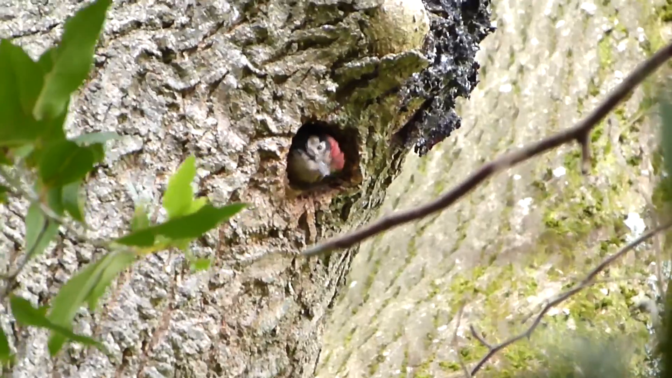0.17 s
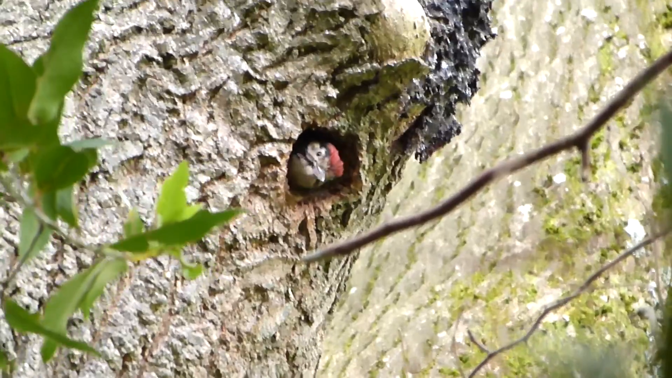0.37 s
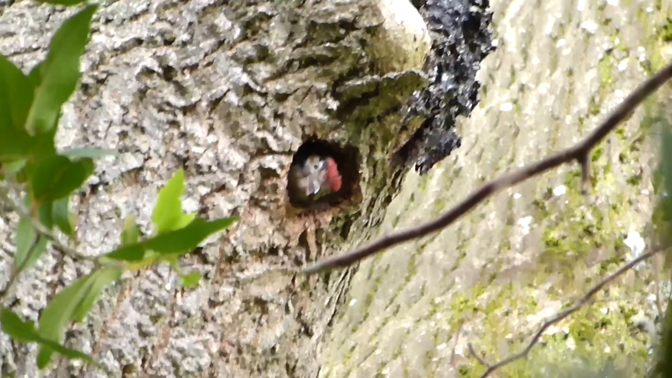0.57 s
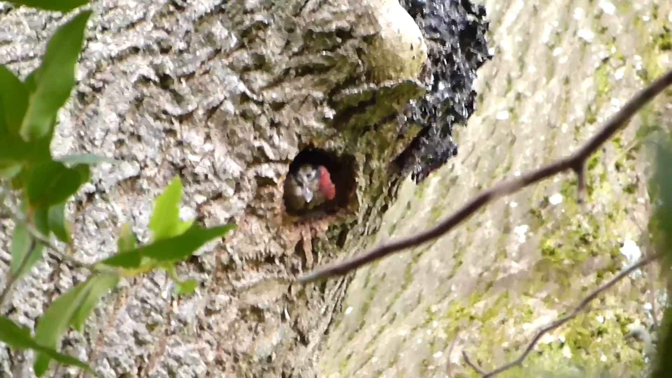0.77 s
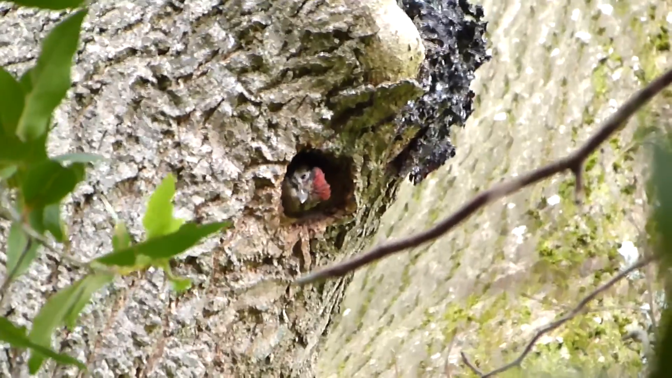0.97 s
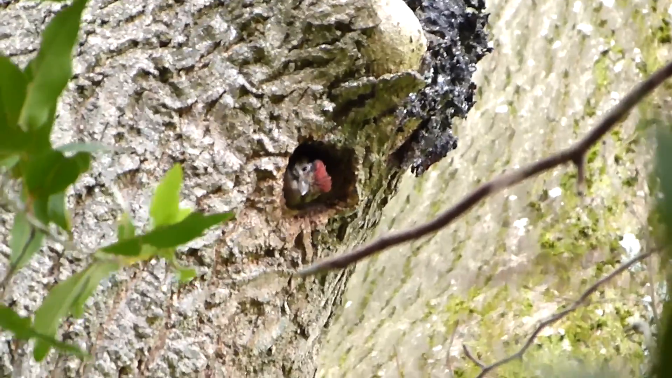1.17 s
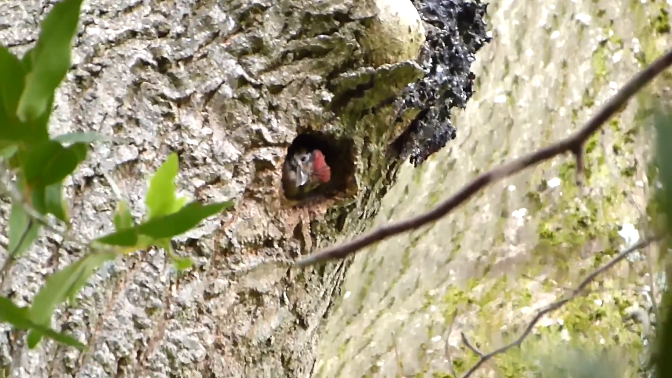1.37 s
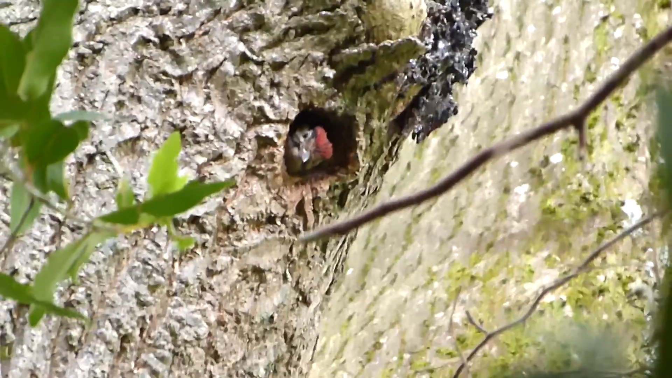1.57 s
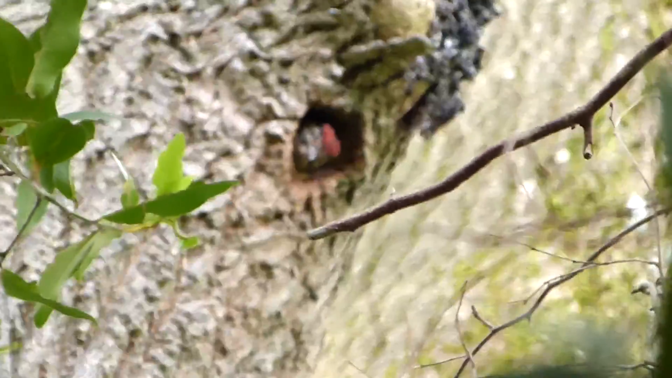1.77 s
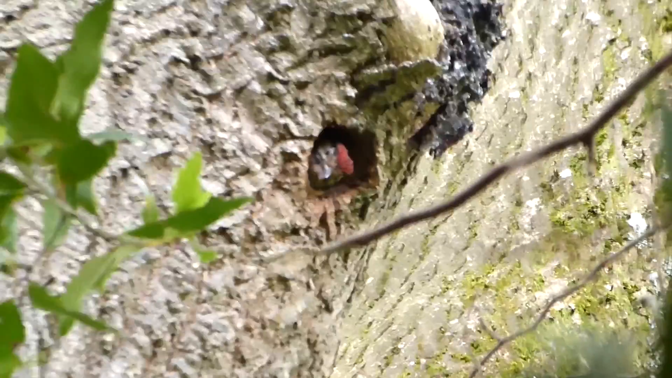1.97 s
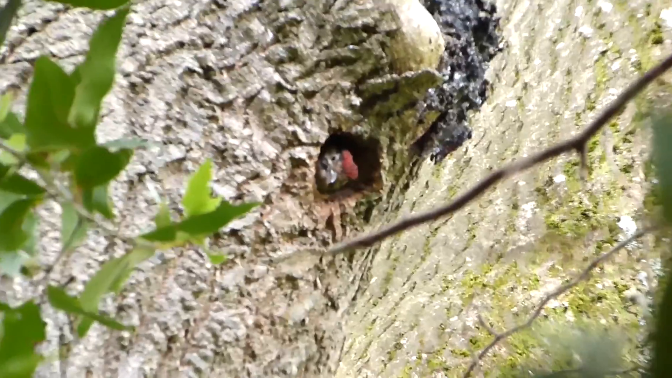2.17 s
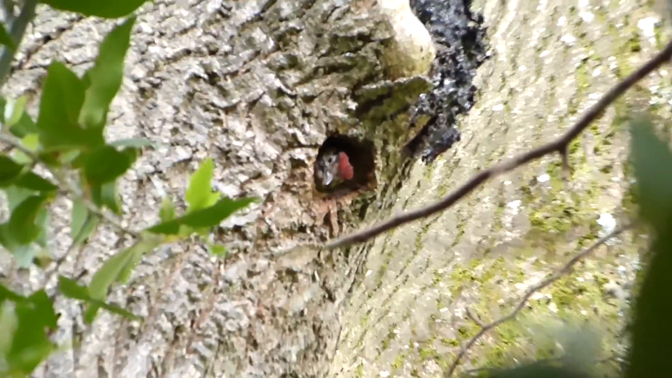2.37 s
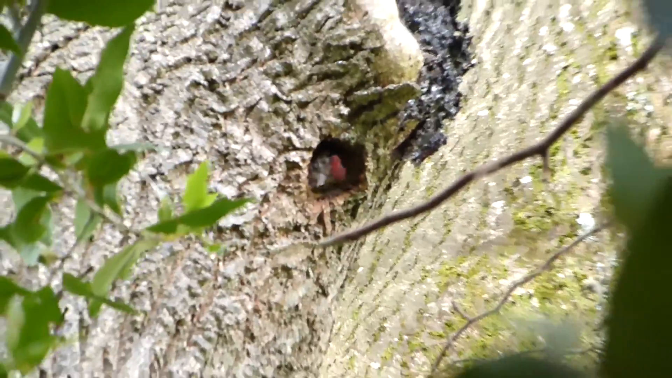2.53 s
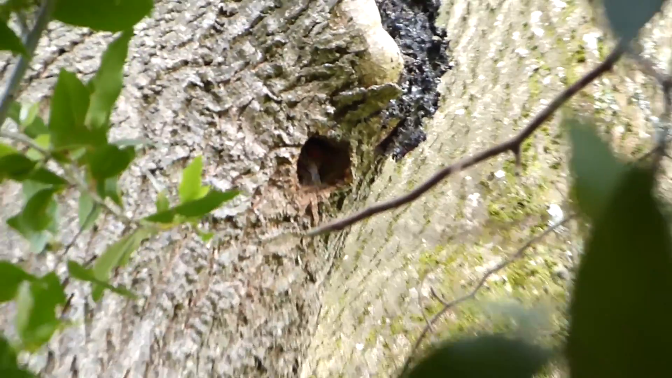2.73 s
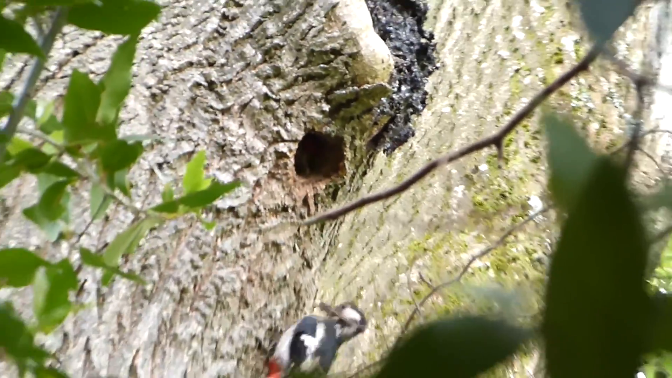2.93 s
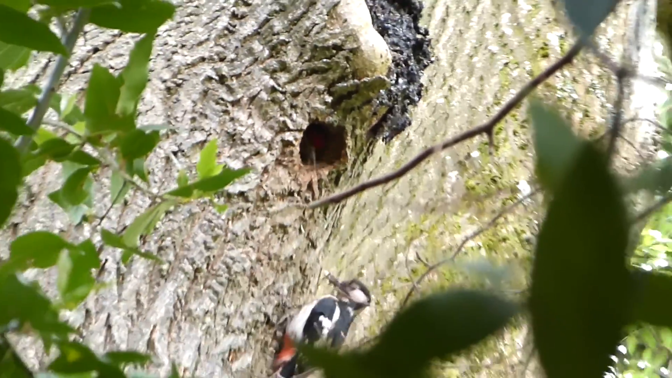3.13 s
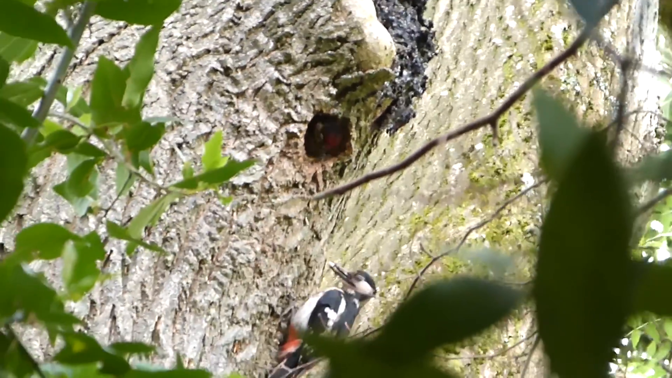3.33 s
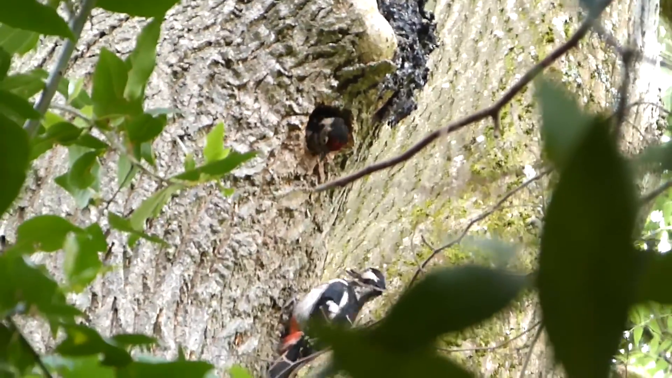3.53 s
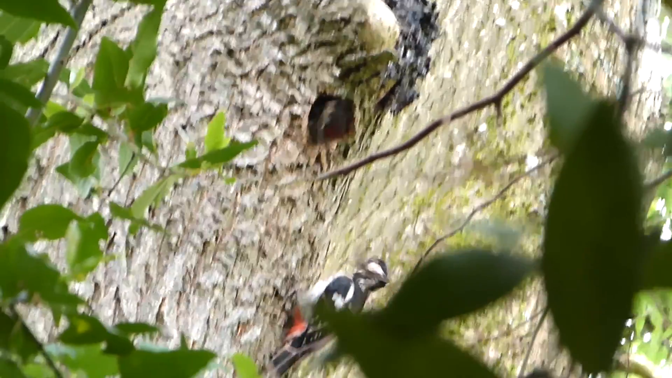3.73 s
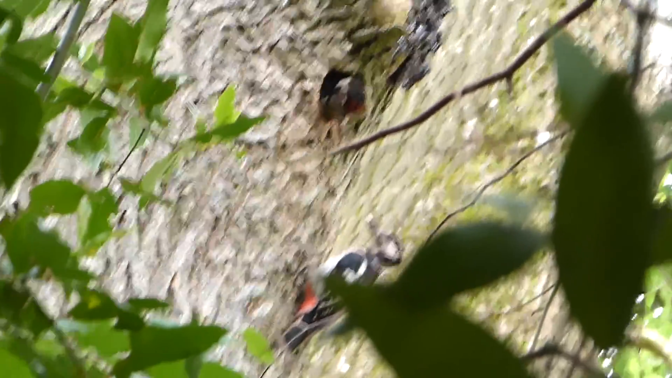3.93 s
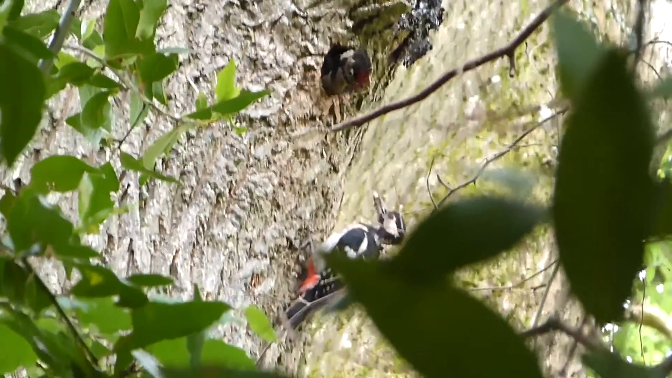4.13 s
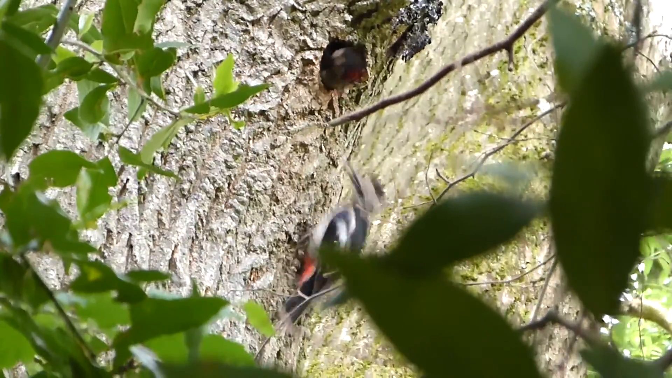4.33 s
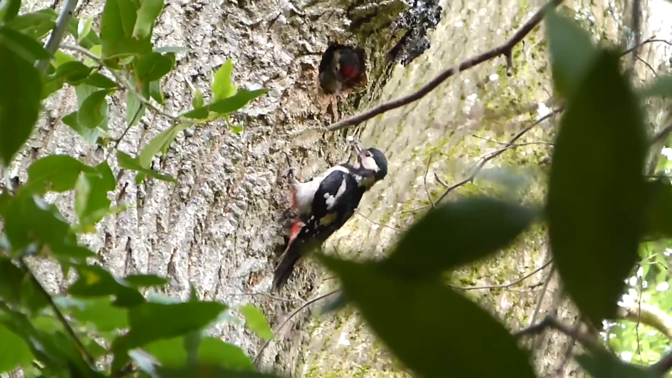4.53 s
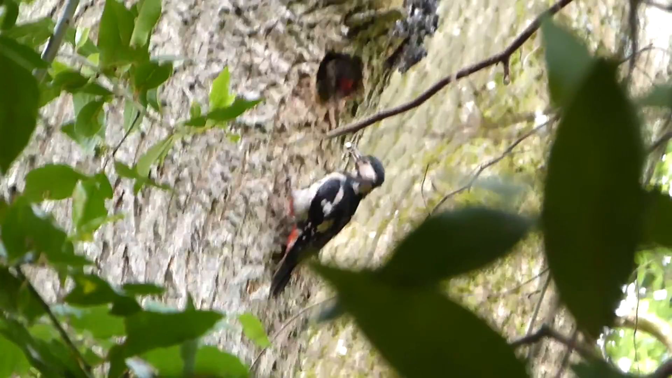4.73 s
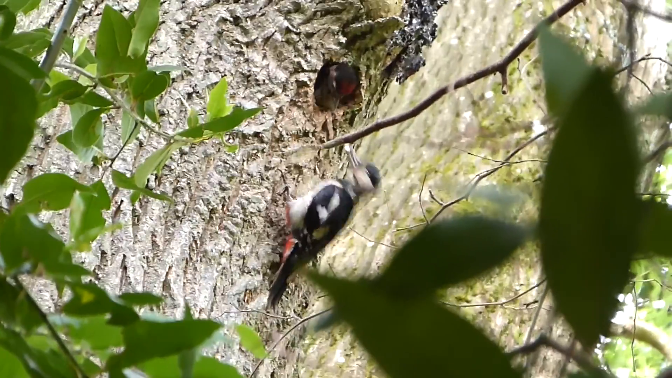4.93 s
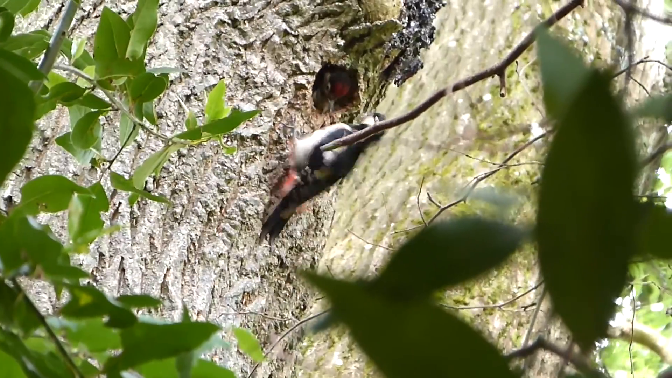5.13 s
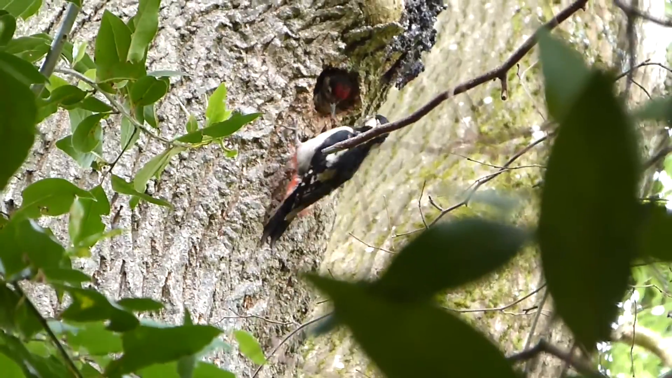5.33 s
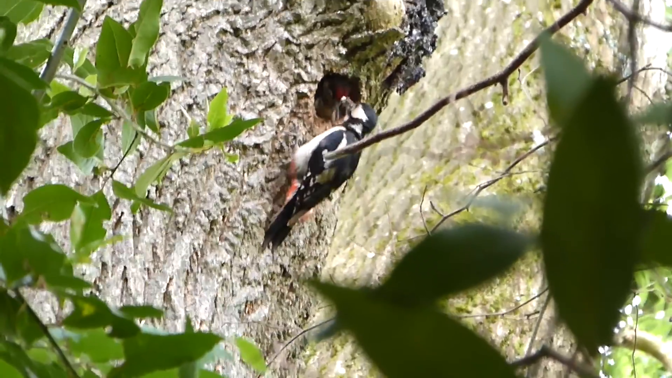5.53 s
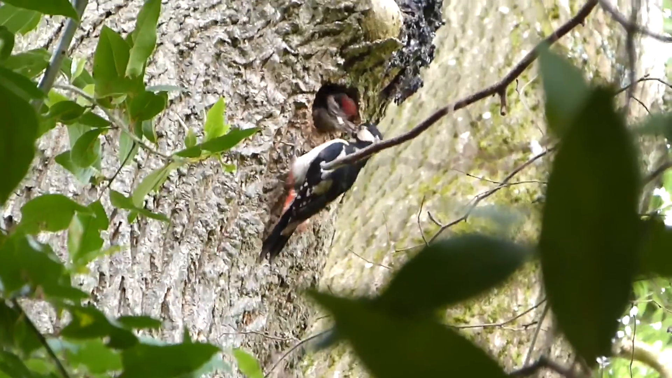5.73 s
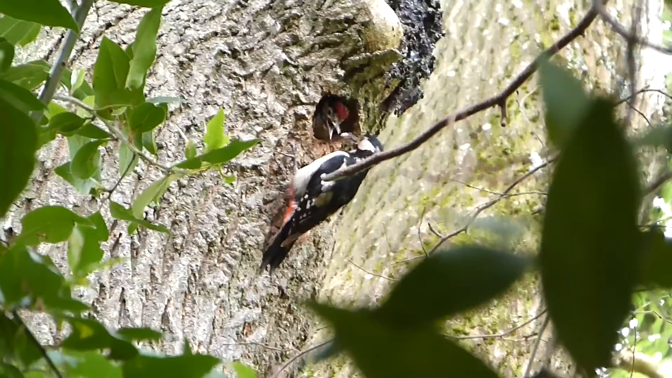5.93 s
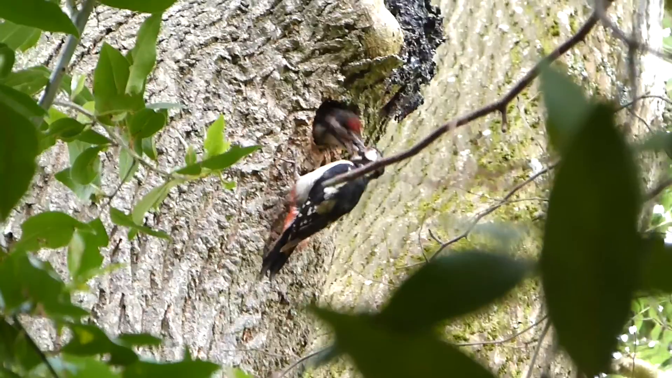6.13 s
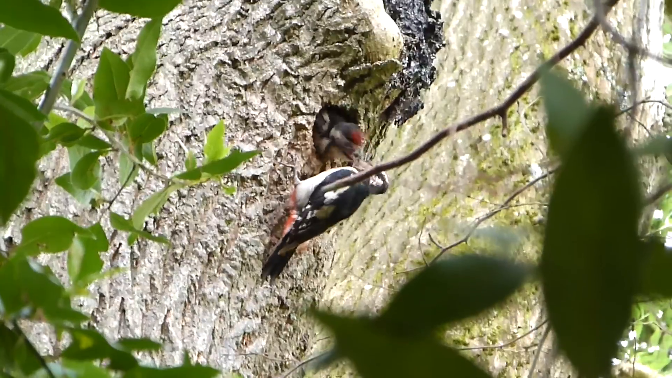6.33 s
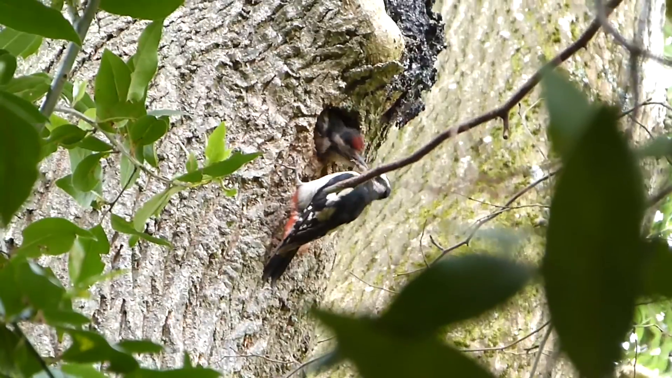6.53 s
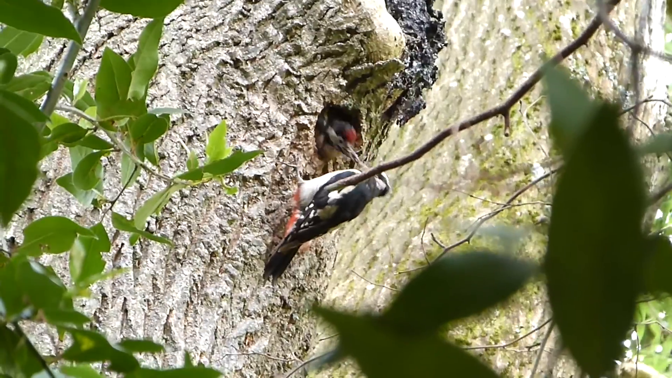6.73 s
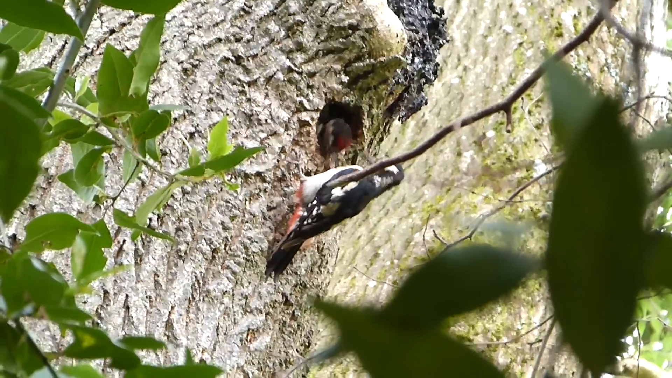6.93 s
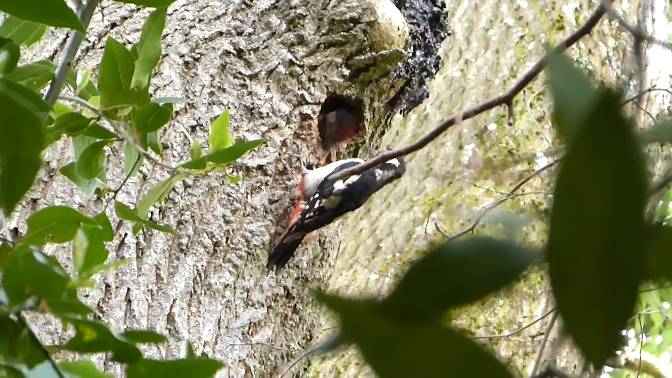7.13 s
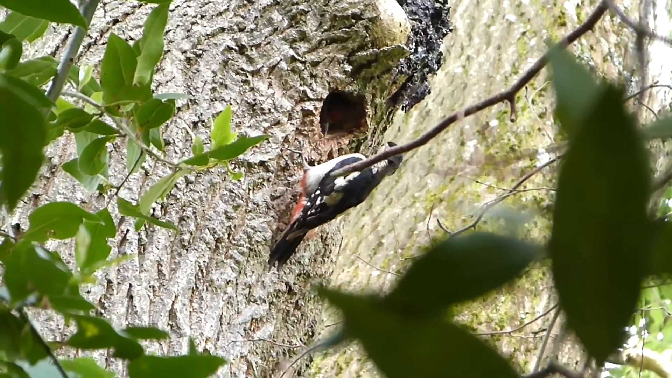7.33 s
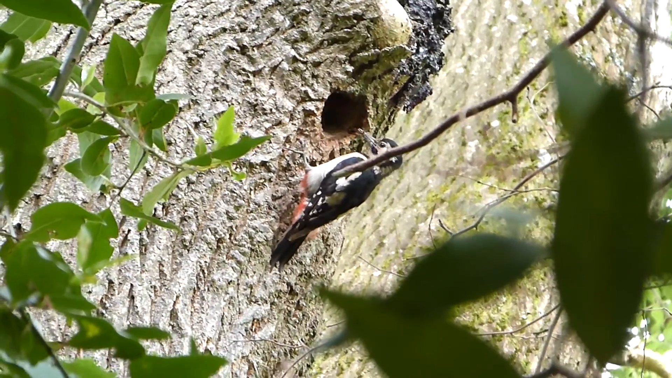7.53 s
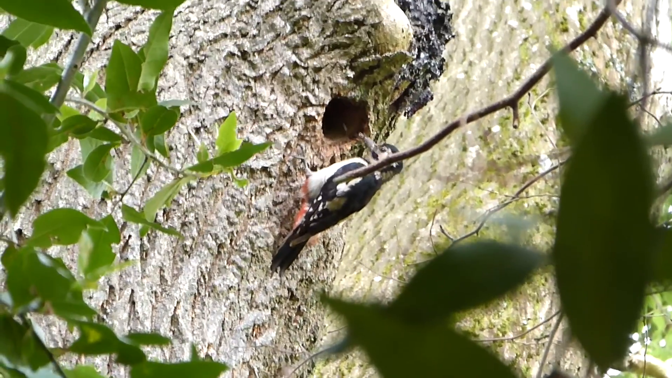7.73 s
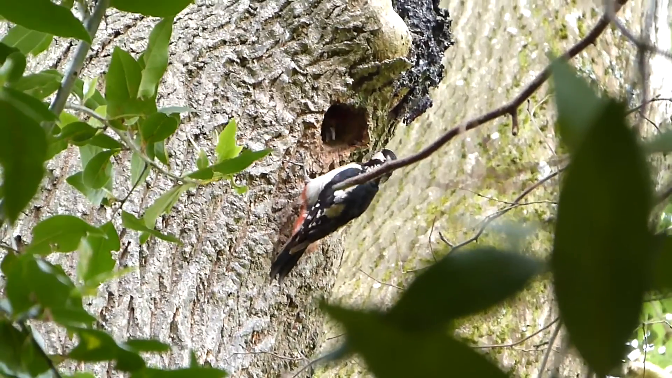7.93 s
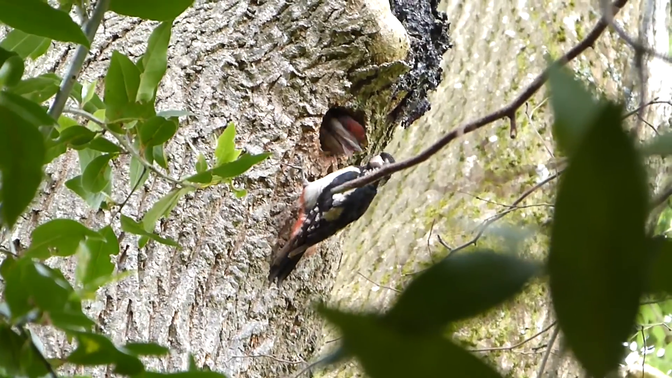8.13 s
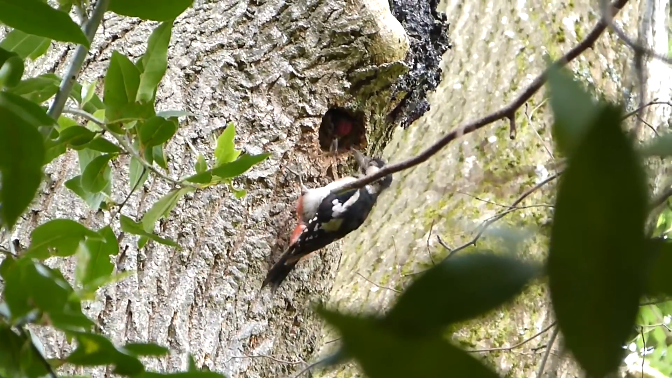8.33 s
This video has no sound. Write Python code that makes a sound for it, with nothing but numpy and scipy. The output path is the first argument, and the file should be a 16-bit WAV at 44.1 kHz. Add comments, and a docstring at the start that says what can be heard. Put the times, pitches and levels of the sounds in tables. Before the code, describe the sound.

A woodpecker chick begs in quick, high arched squeaks, swelling loud and harsh then turning raspy, while a wood pigeon coos low nearby.

```python
"""A wooded garden, close to a nest hole in a tree trunk: a woodpecker chick begs with short arched squeaks
that grow loud, some with harsh squawks, as the parent comes to feed it, then turn quieter and raspier.
Each squeak is a stack of harmonics around a beak resonance; short noise bursts add knocks, ticks and rasps.
A wood pigeon coos nearby, a wavering sine mixed with throat noise; gliding sines make the fainter birds beyond.
The trees return short echoes and noise tails; behind it all lie a steady coloured-noise hush and a deep rumble."""
import sys
import numpy as np
from scipy import signal
from scipy.fft import rfft, irfft
from scipy.io import wavfile

SR = 44100
rng = np.random.default_rng(int(sys.argv[2]) if len(sys.argv) > 2 else 0)


def to_wav(sig):
    """Store sig (one row per channel, or 1-D mono) as 16-bit WAV at the path in sys.argv[1].

    Samples outside -1..1 are clipped; the rate is SR.
    """
    pcm = np.clip(np.atleast_2d(sig), -1, 1) * 32767
    pcm = np.round(pcm).astype(np.int16)
    wavfile.write(sys.argv[1], SR, pcm.T)  # frames by channels


N = 369999
TIME = np.arange(N) / SR   # seconds

# levels of the background, joined by straight lines: time_s, low_hush_db, leaf_hiss_db (both before trim)
HUSH_LEVELS = [(0, -46, -45.5), (1.5, -46.5, -48), (2.4, -50, -47.5), (3.5, -49, -46), (4.2, -46.5, -44),
               (8.39, -45.5, -44)]
LOW_TRIM_DB, LEAF_TRIM_DB = 2.0, 1.0
# colour of the low distant hush: frequency_hz, relative_level_db
LOW_HUSH_COLOUR = [(20, -50), (90, -36), (125, -13.5), (160, -4), (210, -1), (260, 1.5), (400, -2),
                   (600, -4), (900, -7), (1200, -36), (2000, -100)]
# colour of the leaf hiss: frequency_hz, relative_level_db
LEAF_COLOUR = [(350, -12), (600, -9.5), (669, -8.5), (736, -6.5), (1250, -5.5), (1560, -8.5), (3290, -11),
               (6580, -16), (8180, -18.5), (12600, -28.5), (14700, -54), (15500, -60)]
# colour of the deep, distant rumble: frequency_hz, relative_level_db
RUMBLE_COLOUR = [(10, -45), (25, -34), (45, -19), (61, 10), (80, 0), (110, -1), (200, -22), (500, -100)]
RUMBLE_DB = -62   # between its swells
# swells of the rumble: middle_s, half_width_s, rise_db
RUMBLE_SWELLS = [(3.32, 0.055, 14), (6.65, 0.26, 9)]
# how alike the background is at the two microphones: frequency_hz, correlation (0-1)
MICROPHONE_LIKENESS = [(30, 0.36), (80, 0.98), (200, 0.98), (500, 0.96), (1000, 0.82), (2000, 0.35),
                       (4000, 0.44), (8000, 0.12), (14000, 0.055)]

# knocks, ticks, and the chick's scratchy rasps before and during its squeaks:
# start_s, level_db, rise_and_decay_s, centre_hz
SHORT_BURSTS = [(1.31, -48, 0.0017, 401), (1.7408, -32.5, 0.001, 1080), (1.543, -46, 0.0012, 1500),
                (2.953, -49, .005, 9600), (3.215, -48, .007, 5000), (4.435, -47.5, .007, 7000),
                (5.863, -39.5, 0.0069, 6300), (6.078, -33, 0.013, 6470), (6.135, -35.5, 0.0076, 10500),
                (6.319, -39, 0.0097, 9100), (7.64, -53, 0.0072, 2500)]

# thin high notes of small birds further off: start_s, length_s, start_hz, end_hz, level_db
THIN_NOTES = [(1.03, 0.15, 8130, 8300, -56), (1.797, 0.074, 8250, 8100, -52), (1.95, 0.6, 6850, 7000, -56),
              (2.3, 0.19, 8150, 8200, -59), (2.5, .2, 6950, 6800, -59), (5.374, 0.23, 8450, 8550, -47),
              (6.77, .14, 8720, 8450, -52), (6.84, 0.013, 5900, 5650, -37), (6.972, 0.24, 8340, 7900, -55)]
# faint, far gliding calls: start_s, length_s, start_hz, end_hz, level_db
FAR_CALLS = [(1.85, 0.72, 2680, 2530, -58), (3.55, .45, 1092, 968, -46.5), (3.8, 0.38, 990, 840, -50.5),
             (3.72, 0.27, 2170, 1805, -51), (3.9, 0.34, 1400, 1286, -47.5), (7.44, 0.34, 973, 960, -52),
             (7.48, 0.35, 1460, 1420, -55)]

# pigeon's coos, a five-note phrase about every three seconds:
# start_s, length_s, top_pitch_hz, time_to_scoop_s, sag (0-1), level_db (before trim), husky_tail_s
COOS = [(-0.16, 0.27, 532, 0.033, 0.1, -31.5, 0.012), (0.322, 0.51, 531.4, .028, 0.37, -32, 0.035),
        (0.983, 0.2, 524.5, 0.016, .45, -29.5, 0.085), (1.708, .24, 451.6, 0.018, 0.1, -34.5, 0.082),
        (2.129, 0.05, 455.5, 0.0046, .05, -30.5, 0.252), (2.775, 0.26, 498.7, 0.049, 0, -30.5, 0.02),
        (3.28, .53, 511, .028, 0.2, -32, 0.05), (3.962, .18, 513, 0.0183, 0.59, -28.5, 0.075),
        (4.696, 0.28, 430.4, .008, 0, -28.5, 0.069), (5.14, 0.033, 421, 0.0057, .1, -34, .2),
        (5.742, .275, 497.4, 0.073, 0.46, -29, 0.016)]
COO_TRIM_DB = 1.96
# the swollen throat favours the middle of the range: pitch_hz, gain_db
CROP_GAIN = [(340, -11), (378, -8), (415, -3), (450, 2), (490, -2), (515, -4), (538, -5.5)]
SLACK_HZ = 371.2   # pitch of the slack throat, which every coo rises from and falls back towards
COO_SCOOP_S, COO_DROP_S = 0.012, 0.013   # how fast the pitch scoops up and drops
COO_SAG_POWER = 3.3   # higher sags later
COO_ATTACK_S, COO_RELEASE_S, TAIL_FADE_DB_PER_S = 0.0093, 0.032, 20
COO_SWELL_DB = 0.5   # growth from start to end of a coo

# chick's squeaks: middle_s, length_s, pitch_hz, level_db (before trim), beak_resonance_hz, rasp (0-1)
SQUEAKS = [(0.224, .032, 2270, -45, 5890, 0.35), (0.449, 0.028, 2120, -33, 6050, 0.03),
           (0.704, 0.029, 2130, -28.5, 6090, 0.07), (1.154, 0.03, 2110, -29, 6260, 0),
           (1.471, 0.031, 2108, -29.5, 6200, 0.1), (1.776, 0.026, 1978, -33.5, 6280, 0),
           (2.077, 0.034, 2070, -34, 6520, 0), (2.272, 0.026, 2050, -33.5, 6640, 0),
           (2.467, 0.028, 2137, -34.5, 6580, 0.2), (2.683, 0.036, 1982, -29, 8600, 0.28),
           (2.833, 0.043, 2310, -27, 8680, 0.36), (3.014, 0.041, 2282, -28, 8190, 0.48),
           (3.263, 0.04, 2332, -28.5, 8150, 0.39), (3.494, 0.038, 2323, -34, 7750, 0.35),
           (3.711, .04, 2246, -39.5, 6550, 0.09), (3.932, 0.043, 2315, -45, 6920, 0.13),
           (4.169, .041, 2302, -33.5, 7260, 0.22), (4.595, 0.042, 2418, -20.5, 8550, 0.31),
           (4.852, 0.037, 2308, -27, 7630, 0.26), (5.069, 0.046, 2300, -25.5, 8280, 0.11),
           (5.264, 0.041, 2414, -20, 8200, 0.29), (5.502, 0.044, 2220, -27.5, 7800, 0.42),
           (5.706, 0.043, 2404, -20.5, 8430, 0.31), (5.91, .044, 2434, -15.5, 8060, 0.1),
           (6.129, .044, 2331, -17, 5290, 0.07), (6.339, 0.039, 2357, -20, 4940, 0.07),
           (6.588, .024, 2320, -20, 5770, 0), (6.838, .03, 2570, -38, 4200, 0.28),
           (7.071, 0.02, 1912, -29, 5790, 0.51), (7.222, 0.017, 1790, -29, 6320, 0.4),
           (7.37, 0.028, 1665, -31, 5180, .35), (7.529, 0.028, 1463, -43, 5520, .6),
           (7.729, 0.021, 1940, -41, 6600, 0.55), (7.838, 0.019, 2100, -42.5, 4930, 0.35),
           (7.917, 0.033, 2105, -41.5, 7660, .55), (8.057, 0.031, 2143, -27.5, 8500, 0.45),
           (8.235, .034, 2300, -27.5, 7700, 0)]
SQUEAK_TRIM_DB = -5.0
# a harsh second voice, now and then: start_s, length_s, start_hz, end_hz, level_db
SQUAWKS = [(4.122, .036, 4300, 5370, -37.5), (6.104, 0.035, 5700, 7120, -17),
           (6.132, 0.029, 6760, 4840, -20), (6.303, 0.018, 5940, 6600, -27),
           (6.32, 0.025, 5060, 7040, -15.5), (7.054, 0.027, 4600, 5860, -21.5)]
# chick's fixed throat resonances: frequency_hz, gain_db
THROAT_GAIN = [(3400, -1), (4500, 3), (5600, -2), (7200, 1.5), (8400, -1), (9600, .5), (12000, -1),
               (15000, -3)]
# trunks that return the squeaks: delay_s, level_db
TRUNK_ECHOES = [(.009, -44), (0.022, -13.5), (.036, -14)]
BELOW_BEAK_DB_PER_OCT, ABOVE_BEAK_DB_PER_OCT = 17, 22.5   # harmonics fall away on both sides of the beak
RASP_FLATTENS = 1   # share of those slopes lost at full rasp
USUAL_SQUEAK_DB, FUNDAMENTAL_DB = -24, -42.5   # a usual squeak and its clear fundamental, before trim
FUNDAMENTAL_FOLLOWS, FUNDAMENTAL_RASP_DB = 0.44, 18   # it grows less than the rest, and gains with rasp
FULL_SQUEAK_S, GLIDE_PER_S = 0.043, 5.5   # a full squeak is an even arch; a shorter one leans to a fall
# depth of the arch as a share of the pitch: grows with the gape (a higher beak resonance) and with rasp
ARCH, ARCH_BEAK_HZ, ARCH_POWER, ARCH_RASP = 0.095, 7000, 1.6, 0.07
NEST_PAN_DB, NEST_LAG_S = -1.6, 0.000034   # left microphone against right: softer and later

CUTOFF_HZ = 15400


def from_db(db):
    """Decibels to gain."""
    return 10 ** (np.asarray(db) / 20)


def rms_one(x):
    """Scale to unit power."""
    return x / np.sqrt(np.mean(x ** 2) + 1e-20)


def in_time(rows, t=TIME):
    """The columns of a curve, joined by straight lines."""
    s, *columns = np.transpose(rows)
    return [np.interp(t, s, column) for column in columns]


def at_hz(points, hz):
    """Read a spectrum on a log-frequency axis."""
    f, value = np.transpose(points)
    return np.interp(np.log(np.maximum(hz, 1)), np.log(f), value)


def add(track, s, sound):
    """Mix a sound into a track at a time in seconds."""
    i = max(round(s * SR), 0)
    track[i:i + len(sound)] += sound[:N - i]


def wander(rate_hz, size):
    """Smooth random drift of rms 1: white noise through a low-pass."""
    smooth = signal.butter(2, min(rate_hz, SR / 3), fs=SR)
    run_in = int(2 * SR / rate_hz)   # lets the filter settle
    return rms_one(signal.lfilter(*smooth, rng.standard_normal(size + run_in))[-size:])


def resonance(x, hz, width_hz):
    """A band that rings, gain 1 on top."""
    return signal.lfilter(*signal.iirpeak(hz, hz / width_hz, fs=SR), x)


def wide_noise(spectrum):
    """Noise from all around: mid and side are weighted to set how alike the microphones are in each band."""
    hz = np.fft.rfftfreq(N, 1 / SR)
    alike = np.clip(at_hz(MICROPHONE_LIKENESS, hz), -1, 1)
    mid, side = rfft(rng.standard_normal((2, N))) * from_db(at_hz(spectrum, hz))
    mid = irfft(mid * np.sqrt(1 + alike), N)
    side = irfft(side * np.sqrt(1 - alike), N)
    return (mid + side * [[1], [-1]]) / np.std(mid)


def trees(x, wet_db, t60, width, top_hz, buildup_s):
    """Trunks and leaves scatter the sound into a dying stereo tail, here convolved decaying noise."""
    t = TIME[:SR]
    mid, side = rng.standard_normal((2, SR))
    envelope = from_db(-60 * t / t60) * (1 - np.exp(-(t / buildup_s) ** 2))
    tail = (mid + width * side * [[1], [-1]]) * envelope
    tail /= np.sqrt(np.sum(tail ** 2) / 2)
    low_pass = signal.butter(2, min(top_hz, SR * 0.45), fs=SR, output="sos")
    tail = signal.sosfilt(low_pass, tail)
    return from_db(wet_db) * signal.fftconvolve(np.atleast_2d(x), tail, axes=1)[:, :N]


def glides(notes, waver, waver_hz):
    """Sine notes that swell, slide and fade; a strong fast waver makes them harsh."""
    voice = np.zeros(N)
    for s, length, start_hz, end_hz, level_db in notes:
        n = int(length * SR)
        hz = np.linspace(start_hz, end_hz, n) * (1 + waver * wander(waver_hz, n))
        tone = np.sin(2 * np.pi * np.cumsum(hz) / SR)
        add(voice, s, from_db(level_db) * np.hanning(n) * tone)
    return voice


def garden():
    """A deep rumble, a low distant hush and the hiss of leaves, each a wide coloured noise."""
    low_db, leaf_db = in_time(HUSH_LEVELS)
    swell_db = sum(rise_db * np.exp(-((TIME - s) / width) ** 2) for s, width, rise_db in RUMBLE_SWELLS)
    low_db = low_db + LOW_TRIM_DB + 0.55 * wander(6.1, N)
    leaf_db = leaf_db + LEAF_TRIM_DB + 0.5 * wander(3.24, N)
    rumble = from_db(RUMBLE_DB + swell_db) * wide_noise(RUMBLE_COLOUR)
    low = from_db(low_db) * wide_noise(LOW_HUSH_COLOUR)
    leaves = from_db(leaf_db) * wide_noise(LEAF_COLOUR)
    return rumble + low + leaves


def short_bursts():
    """Knocks, ticks and the chick's scratchy rasps: short noise bursts, each in a broad band of its own."""
    bursts = np.zeros(N)
    for s, level_db, decay, hz in SHORT_BURSTS:
        age = TIME[:SR // 4] / decay
        width_hz = 2500 + 0.21 * hz
        band = resonance(rng.standard_normal(len(age)), hz, width_hz)
        burst = rms_one(resonance(band, hz, width_hz))
        add(bursts, s, from_db(level_db) * age * np.exp(1 - age) * burst)
    return bursts + trees(bursts, wet_db=4.5, t60=0.12, width=0.95, top_hz=12000, buildup_s=0.00092)


def far_birds():
    """Soft gliding whistles, with a tail among the trees."""
    thin = glides(THIN_NOTES, waver=0.0122, waver_hz=200)
    voice = thin + glides(FAR_CALLS, waver=0.015, waver_hz=121)
    return voice + trees(voice, wet_db=0.5, t60=0.36, width=0.38, top_hz=12700, buildup_s=0.009)


def coo_shape(age, length, top_hz, scoop_s, sag, tail_s):
    """Pressure scoops the pitch up, sags and lets go; gives pitch in Hz, throat level in dB and end fades."""
    over = np.maximum(age - length, 0)   # seconds into the tail
    progress = np.minimum(age / length, 1)
    scoop = 1 / (1 + np.exp((scoop_s - age) / COO_SCOOP_S))
    lift = scoop * (1 - sag * progress ** COO_SAG_POWER) * np.exp(-over / COO_DROP_S)
    hz = SLACK_HZ + (top_hz - SLACK_HZ) * lift
    level_db = at_hz(CROP_GAIN, hz) + COO_SWELL_DB * (progress - 0.5) - TAIL_FADE_DB_PER_S * over
    fade = np.minimum(age / COO_ATTACK_S, (length + tail_s - age) / COO_RELEASE_S)
    return hz, level_db, np.clip(fade, 0, 1)


def pigeon(flutter=0.071, waver=0.0037, quaver=0.012, unsteady_db=0.26,
           husk_share=0.63, husk_growth=1.7, husk_clears=0.83):
    """Each coo starts as a purer hoot and turns husky, as noise ringing in the swollen throat joins the sine."""
    voice = np.zeros(N)
    throat = rms_one(resonance(resonance(rng.standard_normal(N), 441, 68), 441, 68))
    for s, length, top_hz, scoop_s, sag, coo_db, tail_s in COOS:
        t = np.arange(max(s, 0), s + length + tail_s, 1 / SR)
        n = len(t)
        hz, shape_db, fade = coo_shape(t - s, length, top_hz, scoop_s, sag, tail_s)
        level_db = coo_db + shape_db + unsteady_db * wander(20, n)
        unsteady_hz = hz * (1 + waver * wander(62, n) + quaver * wander(13.25, n))
        phase = 2 * np.pi * np.cumsum(unsteady_hz) / SR
        hoot = np.sqrt(2) * (1 + flutter * wander(49.7, n)) * np.sin(phase)
        # huskier as the coo goes on, clearer when it is loud
        husk = husk_share * np.linspace(0.2, husk_growth, n) * from_db(-husk_clears * (level_db + 39.0))
        husk = np.clip(husk, 0, 0.85)
        sound = np.sqrt(1 - husk ** 2) * hoot + husk * throat[(t * SR).astype(int)]
        add(voice, t[0], from_db(level_db + COO_TRIM_DB) * sound * fade)
    direct = voice * from_db([[0.3], [-0.3]])   # a little left of centre
    return direct + trees(voice, wet_db=-9.0, t60=0.74, width=0.31, top_hz=2000, buildup_s=0.0053)


def harmonic_levels(pitch, level_db, beak_hz, rasp):
    """Throat and beak lift the harmonics near their resonances; rasp evens out the beak's slopes. In dB."""
    hz = pitch * np.arange(2, 9)
    octaves = np.log2(hz / beak_hz)
    fall_db = np.maximum(-BELOW_BEAK_DB_PER_OCT * octaves, ABOVE_BEAK_DB_PER_OCT * octaves)
    first_db = FUNDAMENTAL_DB + FUNDAMENTAL_FOLLOWS * (level_db - USUAL_SQUEAK_DB)
    first_db += FUNDAMENTAL_RASP_DB * rasp
    return [first_db, *(level_db + at_hz(THROAT_GAIN, hz) - fall_db * (1 - RASP_FLATTENS * rasp))]


def squeak(length, pitch, glide, arch, levels, rasp, drop=0.1544, lock_in=1.1, lock_spread=0.13,
           jitter=0.106, smear_db=-8, throb=0.31, break_up=0.17, scratch_db=-13, lead_in=0.25):
    """One squeak: a scratchy start, an arch of pitch, then the tone collapses into noise."""
    u = np.arange(-1.5 * length, 1.5 * length, 1 / SR) / (length / 2)   # -1 to 1 while the note is strong
    n = len(u)
    collapse = np.clip((u - 0.45) / 0.93, 0, 1) ** 2
    rough = rasp * (0.28 + 1.06 * np.clip(-u, 0, 1)) + break_up * collapse
    hz = pitch * (1 + glide * np.clip(u, -1, 1) - arch * np.minimum(u * u, 1.2) - drop * collapse)
    hz = hz * (1 + jitter * rough * wander(1100, n) + 0.0081 * wander(135.4, n))
    phase = 2 * np.pi * np.cumsum(hz) / SR
    # the syrinx scratches softly before the tone locks in, and harder as it lets go
    scratch_shape = np.exp(-(2 * u - 1.4) ** 2) + lead_in * np.exp(-(u + 1.17) ** 2)
    scratch = from_db(scratch_db) * np.sqrt(rasp + 0.011) * scratch_shape
    locked = 1 / (1 + np.exp(-(u + lock_in) / lock_spread))   # the tone starts abruptly
    out = np.zeros(n)
    for k, gain in enumerate(from_db(levels), 1):
        # irregular opening smears noise around each harmonic
        smear = from_db(smear_db) * np.sqrt(rough) * (wander(708, n) + 1j * wander(759, n))
        # the fundamental starts first and lasts longest
        bell = np.exp(-(u * (1.25 - 0.5 / k ** 2)) ** 2)
        swell = rms_one(locked * bell) * np.sqrt(2 / 3)
        spread = 2 * np.pi * scratch * wander(1445, n)
        harmonic = np.real((swell * (1 + smear) + spread) * np.exp(1j * k * phase))
        out += gain * harmonic * (k * hz < SR / 2)
    return out * (1 + throb * wander(206, n))


def chick():
    """The squeaks leave the hole, bounce off nearby trunks and ring on among the trees."""
    voice, echoes = np.zeros(N), np.zeros(N)
    for s, length, pitch, level_db, beak_hz, rasp in SQUEAKS:
        glide = GLIDE_PER_S * (length - FULL_SQUEAK_S)
        arch = ARCH * (beak_hz / ARCH_BEAK_HZ) ** ARCH_POWER + ARCH_RASP * rasp
        levels = harmonic_levels(pitch, level_db, beak_hz, rasp)
        note = squeak(length, pitch, glide, arch, levels, np.clip(rasp, 0, 1))
        note = from_db(SQUEAK_TRIM_DB) * note
        start = s - len(note) / SR / 2
        add(voice, start, note)
        for delay, db in TRUNK_ECHOES:
            # the paths shift a little as the bird moves its head
            add(echoes, start + delay + rng.normal(0, 0.00061), from_db(db) * note)
    voice = voice + glides(SQUAWKS, waver=0.054, waver_hz=756)
    heard = voice + echoes
    direct = np.array([np.interp(TIME - NEST_LAG_S, TIME, heard), heard])
    near = trees(voice, wet_db=-2, t60=0.14, width=0.88, top_hz=13400, buildup_s=0.002)
    # the farther trees return a band around 7 kHz
    far = trees(resonance(direct, 7050, 2100), wet_db=-9, t60=0.25, width=0.9, top_hz=13000, buildup_s=0.057)
    return (direct + near + far) * from_db(NEST_PAN_DB * np.array([[0.5], [-0.5]]))


def scene():
    """All sources together, from the background to the nest."""
    return garden() + short_bursts() + far_birds() + pigeon() + chick()


def record(dry):
    """The recorder cuts the top steeply, with an elliptic low-pass."""
    return signal.sosfilt(signal.ellip(10, 0.2, 80, CUTOFF_HZ, fs=SR, output="sos"), dry)


dry = scene()
out = record(dry)
to_wav(out)
```